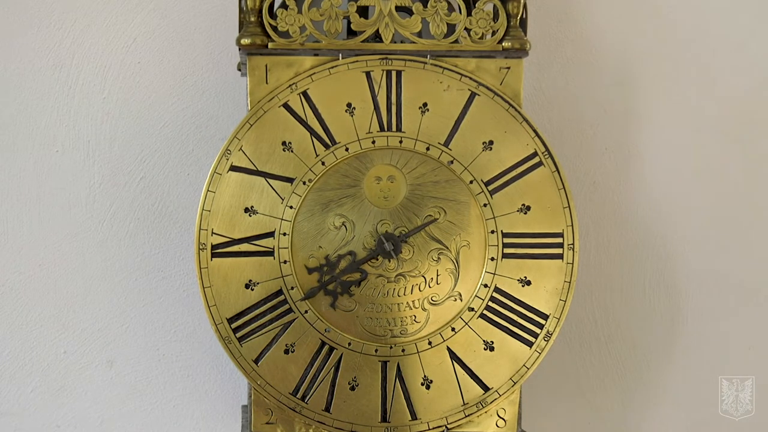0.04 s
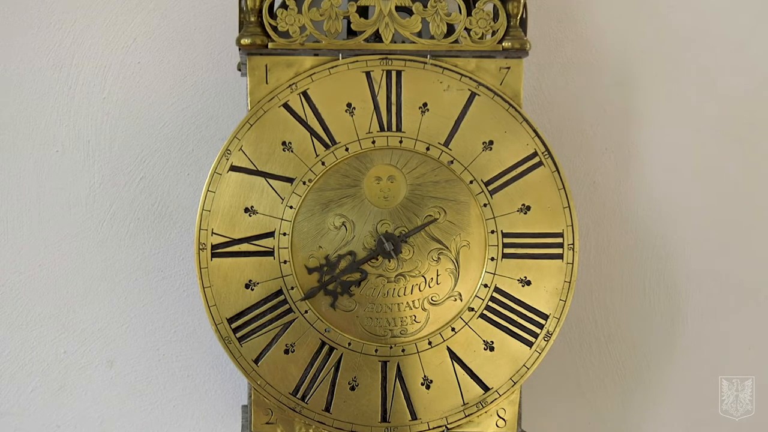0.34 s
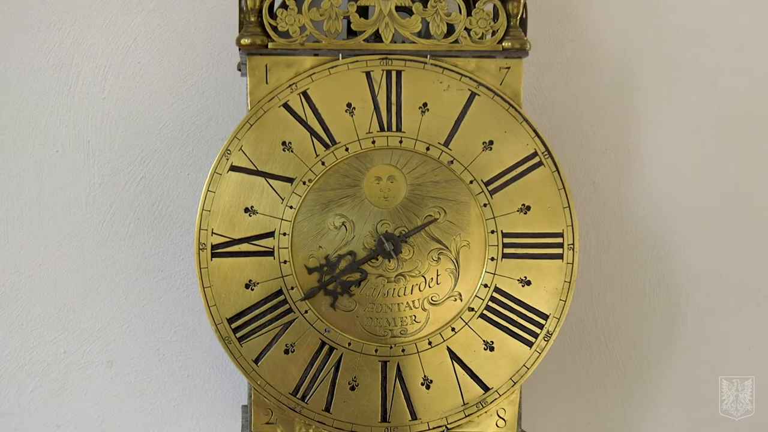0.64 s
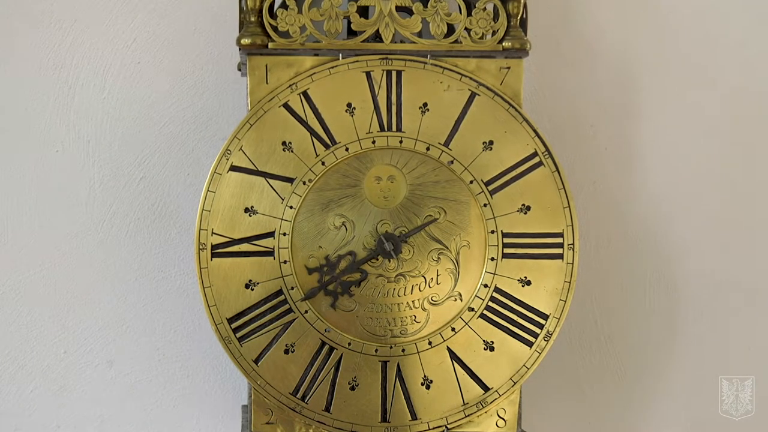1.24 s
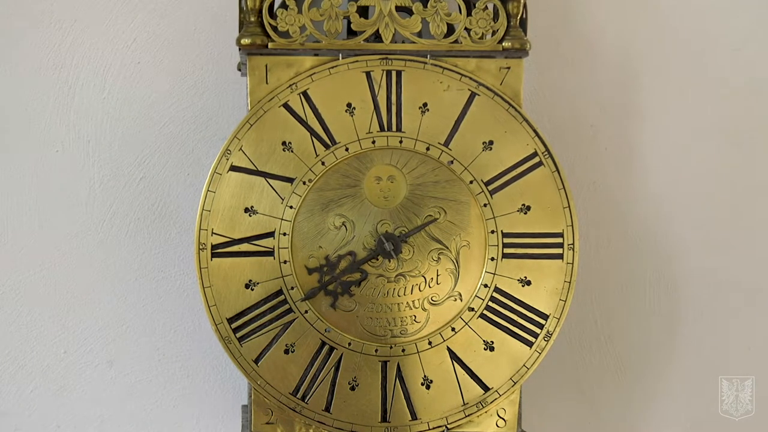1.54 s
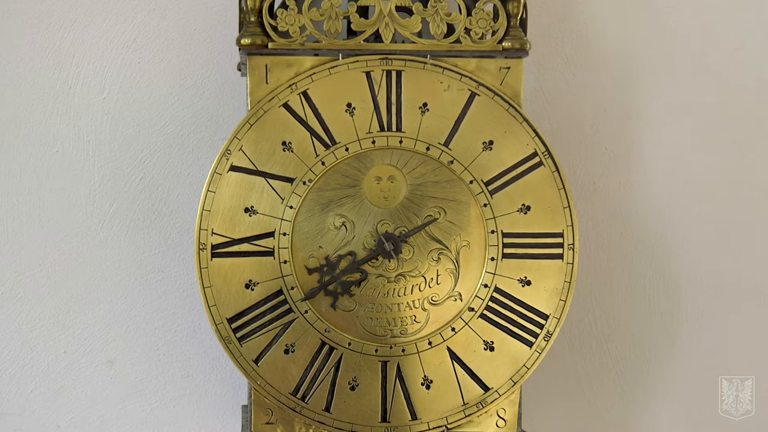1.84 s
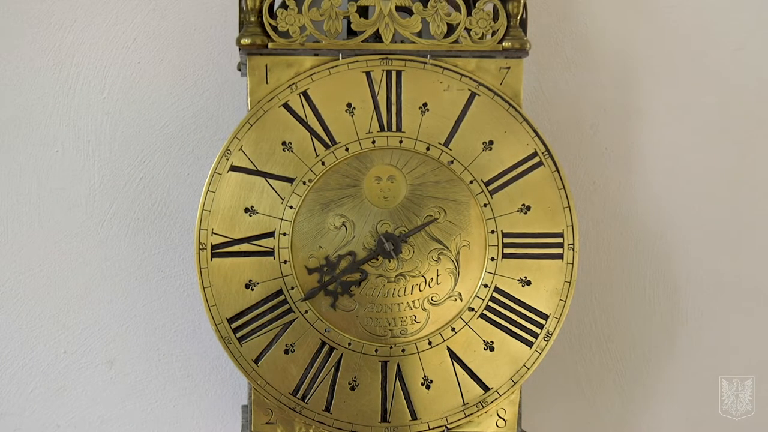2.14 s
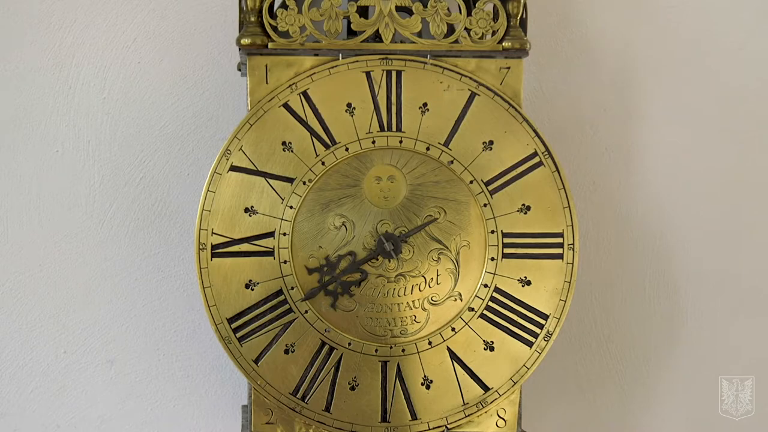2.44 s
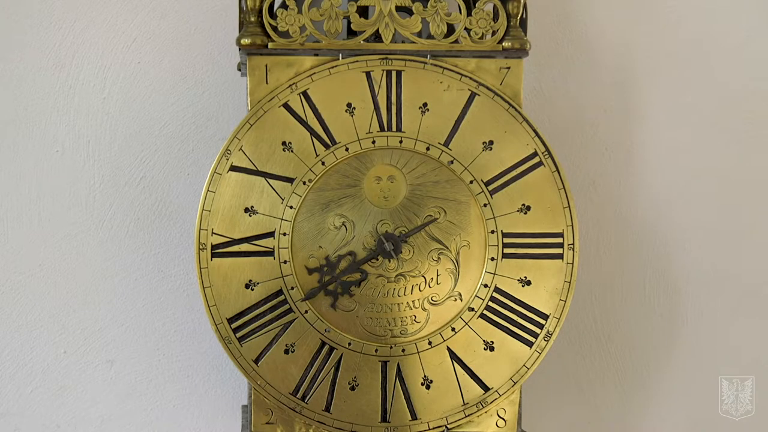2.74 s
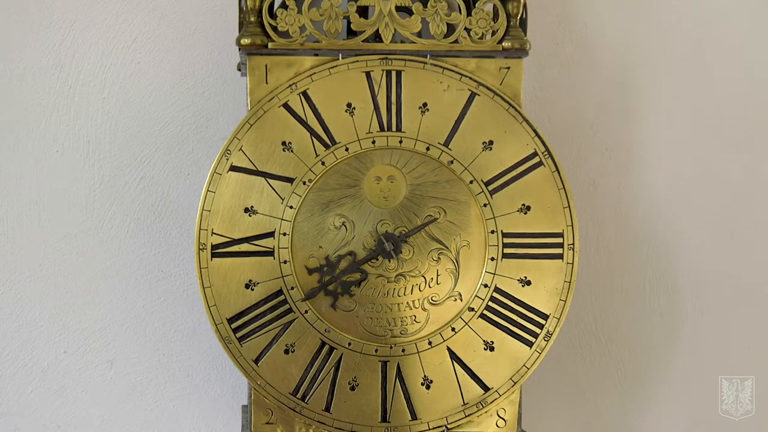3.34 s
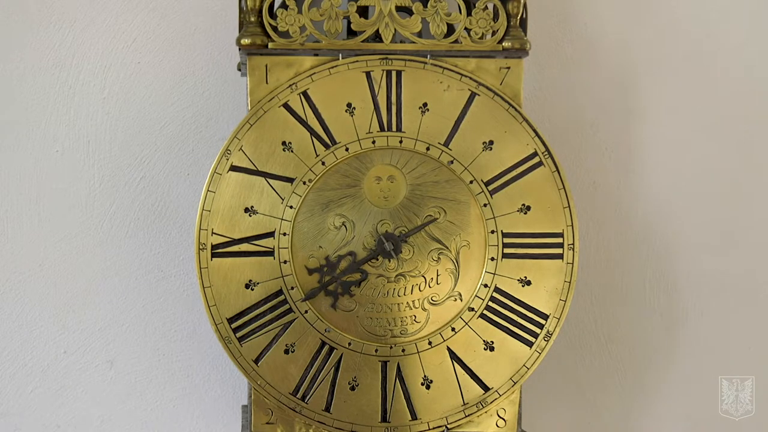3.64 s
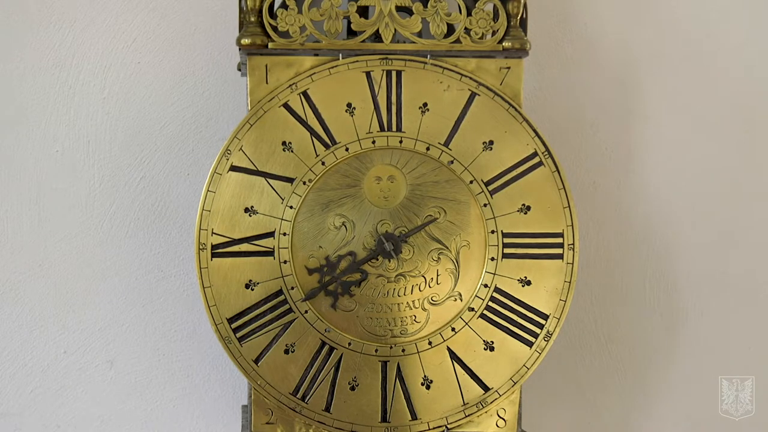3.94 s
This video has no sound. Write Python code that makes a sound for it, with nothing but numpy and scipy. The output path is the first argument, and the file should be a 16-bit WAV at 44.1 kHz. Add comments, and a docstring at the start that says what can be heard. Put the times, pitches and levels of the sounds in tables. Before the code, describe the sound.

A brass clock strikes its bell, heard close in a small room. At first the bell still rings from an earlier blow, over faintly whirring, rattling gears with small clicks and dull knocks. At about 1.3 and 3.5 seconds the hammer hits, each time just after a lever clicks. Each bright clang dies quickly into a lingering, wavering ring, while the mechanism noise dips and swells back.

```python
"""A brass lantern clock strikes the hour in a small room, heard close on a stereo pair of microphones.
Its bell still rings from the blow before. The gear train whirrs and rattles, pins and levers click
and knock the case, and twice the hammer hits: a bright clang dies fast over slowly beating low partials.
The room rumbles faintly underneath. The recorder's gain control ducks at each blow and swells back."""
import sys
import numpy as np
from scipy import signal
from scipy.fft import rfft, irfft
from scipy.io import wavfile
from scipy.ndimage import uniform_filter1d, minimum_filter1d

SR = 44100
rng = np.random.default_rng(int(sys.argv[2]) if len(sys.argv) > 2 else 0)


def transcribe(signal):
    """Save signal, clipped to [-1, 1], as a 16-bit WAV file at the path in sys.argv[1]."""
    frames = np.atleast_2d(signal).T
    limited = np.clip(frames, -1, 1)
    pcm = np.round(limited * 32767).astype(np.int16)
    wavfile.write(sys.argv[1], SR, pcm)


N = 176400

# hammer blows: t/s, strength/dB, extra level/dB of the hum note, of the second and of the third partial
HAMMER_BLOWS = [(-1.078, 0, 2.8, -2.3, .3), (1.2603, 0, -2, .3, 0), (3.477, 0, -.7, -7, -1.3)]
# spectrum of rattling teeth, pins and levers: f/Hz, relative level/dB
METAL_SPECTRUM = [(200, -6), (1000, -5.5), (2500, 0), (5500, -2), (9000, -5.5), (12000, -14.5),
                  (16000, -21.5)]


def amp(db):
    return 10 ** (np.asarray(db) / 20)


def unit(x):
    return x / np.sqrt(np.mean(x ** 2) + 1e-20)


def pan(db):
    """Left and right gains for a level difference."""
    return amp(np.array([[db], [-db]]) / 2)


def since(s):
    """Seconds since the moment s, for every sample."""
    return np.arange(N) / SR - s


def fade(t, t60):
    """Exponential decay that starts at t = 0."""
    return (t >= 0) * np.exp(-np.log(1000) * np.maximum(t, 0) / t60)


def tone(turns, lead):
    """A sine that reaches the left microphone ahead of the right by lead radians."""
    return np.sin(2 * np.pi * turns + np.array([[lead], [-lead]]) / 2)


def noise(spectrum, correlation=.93):
    """Coloured noise of unit RMS, nearly the same at both microphones."""
    hz, db = np.transpose(spectrum)
    gains = amp(np.interp(np.log(np.fft.rfftfreq(N, 1 / SR) + 1), np.log(hz), db))
    mid, side = irfft(rfft(rng.standard_normal((2, N))) * gains, N)
    return unit(mid * np.sqrt(1 + correlation) + side * np.sqrt(1 - correlation) * np.array([[1], [-1]]))


def bell():
    """Each blow sets all partials ringing anew; close twins make them beat."""
    # long partials: f/Hz, relative level/dB, t60/s, left-right/dB, left's lead/rad,
    # twin's offset/Hz, twin's level/dB, first swell/s
    long_partials = [(412.2, -51.7, 28, 2, -.18, 7.0, -16, .06),
                     (1135.0, -39.6, 15, -3.9, -.57, 2.15, -10.5, .43),
                     (2099.3, -26.6, 5.8, -3.7, -.18, 6.55, -16, .085),
                     (3278.5, -28.8, 2.5, -2, .48, -10.93, -4.2, .071)]
    # short partials of the clang: f/Hz, relative level/dB, t60/s, left-right/dB
    clang_partials = [(2125, -31, .09, -1), (4668, -28, .6, 5.5), (5431, -25.5, .48, 0), (5616, -39, .3, 0),
                      (5857, -31, .72, -1), (6234, -29, .58, 2), (7230, -49, .65, 0), (7338, -45, .55, 0),
                      (7984, -29, .56, -.6), (8387, -37, .3, 0), (8699, -41.5, .35, 0),
                      (9787, -33, .33, -.6), (9904, -41, .48, 0), (11238, -42, .5, 0), (11657, -45, .52, 0),
                      (11975, -48, .38, 0), (12840, -50, .3, 0), (13490, -60, 1.2, 0), (13690, -57, .62, 0),
                      (14218, -51, .5, 0), (14725, -56, .3, 0), (15180, -60, .42, 0)]
    twin_pan = pan(db=8)
    out = np.zeros((2, N))
    ends = [blow[0] for blow in HAMMER_BLOWS[1:]] + [N / SR]
    for (start, blow_db, *extras), end in zip(HAMMER_BLOWS, ends):
        span = (since(start) >= 0) & (since(end) < 0)
        t = since(start)[span]
        ring = np.zeros((2, len(t)))
        for partial, extra_db in zip(long_partials, extras + [0]):
            hz, db, t60, side_db, lead, beat_hz, twin_db, swell_s = partial
            twin = amp(twin_db) * twin_pan * tone(hz * t + beat_hz * (t - swell_s), lead)
            ring += amp(db) * pan(side_db) * fade(t, t60) * (amp(extra_db) * tone(hz * t, lead) + twin)
        for hz, db, t60, side_db in clang_partials:
            phase, twin_phase = rng.random(2)
            beat_hz = rng.uniform(6, 18)
            lead = rng.choice([-.33, .33])
            twin = amp(-10.5) * twin_pan * tone((hz - beat_hz) * t + twin_phase, -2 * lead)
            ring += amp(db + 1.3) * pan(side_db) * fade(t, t60) * (tone(hz * t + phase, lead) + twin)
        out[:, span] = np.sqrt(2) * amp(blow_db - 1) * ring
    return out


def gear_whirr():
    """Wheels and fly whirr unevenly: the level flickers, as a whole and in patches of the spectrum."""
    # spectrum of the running train: f/Hz, relative level/dB
    whirr_spectrum = [(25, -33), (70, -10.5), (100, -11.5), (140, -2.5), (180, -6.5), (225, 3.5), (255, -1),
                      (285, 5), (365, 3), (460, -9), (520, -2.5), (600, -11.5), (850, -7.5), (1350, -7),
                      (1800, -12.5), (3000, -12.5), (6000, -17.5), (10000, -24), (15000, -37)]
    patch_db, flicker_db = 2.26, 1.36
    frames = signal.stft(noise(whirr_spectrum), nperseg=512, noverlap=384)[2]
    patches = uniform_filter1d(rng.standard_normal(frames.shape[1:]), size=5, axis=0)
    patches = unit(uniform_filter1d(patches, size=18, axis=1))
    flicker = unit(uniform_filter1d(rng.standard_normal(frames.shape[2]), size=9))
    frames *= amp(patch_db * patches + flicker_db * flicker)
    whirr = signal.istft(frames, nperseg=512, noverlap=384)[1][:, :N]
    return amp(-64) * unit(whirr)


def gear_rattle(hits_per_s=170, spread_db=3):
    """Gear teeth hit at random, each a tiny burst of noise."""
    hits = rng.random(N) < hits_per_s / SR
    teeth = hits * amp(spread_db * np.minimum(rng.exponential(1, N), 4))
    power = signal.fftconvolve(teeth ** 2, fade(since(0), t60=.032) ** 2)[:N]
    return amp(-72.5) * unit(np.sqrt(abs(power)) * noise(METAL_SPECTRUM))


def room_rumble():
    """Steady low room tone."""
    # spectrum of the room tone: f/Hz, relative level/dB
    rumble_spectrum = [(20, -33), (35, -21.5), (48, -12), (70, 2.5), (95, -8.5), (140, -9.5), (250, -15.5),
                       (1000, -51), (16000, -79.5)]
    return amp(-78) * noise(rumble_spectrum)


def levers():
    """Pins slip with a hard tick and a short rustle; the hammer lever trips just before each blow."""
    # clicks of levers and pins: t/s, level/dB
    clicks = [(.435, -68), (.6155, -66), (0.765, -66), (1.0016, -70), (1.05, -64), (1.1717, -68),
              (1.2089, -51.5), (1.241, -55.5), (1.876, -59), (2.4433, -63), (2.5654, -61.5), (2.816, -68),
              (3.2994, -69.5), (3.4318, -52.5), (3.462, -59.5)]
    ticks = sum(amp(db - 6) * fade(since(s), t60=.0069) for s, db in clicks)
    rustles = sum(amp(db) * fade(since(s), t60=.15) for s, db in clicks)
    return (ticks + rustles) * noise(METAL_SPECTRUM)


def case_knocks():
    """Slipping pins and levers ring the low modes of the case."""
    # dull knocks of the train against the case: t/s, level/dB
    knocks = [(.435, -61.5), (1.2092, -62), (2.816, -71), (3.4325, -65)]
    # modes of the case: f/Hz, relative level/dB, t60/s
    modes = [(228, -1.5, 0.69), (274.7, -3, .45), (378, -3, 0.95), (527, -4, .45)]
    return sum(amp(db + mode_db) * fade(since(s), t60) * np.sin(2 * np.pi * hz * since(s))
               for s, db in knocks for hz, mode_db, t60 in modes)


def hammer():
    """The crack of iron on bronze and its short wash in the room."""
    # spectrum of the hammer's contact: f/Hz, relative level/dB
    crack_spectrum = [(25, -32), (100, -14), (300, -15), (800, -25.5), (1800, -15), (2200, 9.5), (2700, -6),
                      (3200, 0), (3700, -5), (5600, 3), (9000, -10), (12000, -12), (16000, -20)]
    # spectrum of the room's answer: f/Hz, relative level/dB
    wash_spectrum = [(25, -33.5), (100, -11), (400, -10.5), (1200, -5.5), (2200, -7), (2700, -11.5),
                     (3900, -10), (4700, -2.5), (5600, -2.5), (8000, -3.5), (12000, -10.5), (16000, -25.5)]
    crack = sum(amp(db - 23) * fade(since(s), t60=.062) for s, db, *_ in HAMMER_BLOWS)
    wash = sum(amp(db - 41) * fade(since(s), t60=.6) for s, db, *_ in HAMMER_BLOWS)
    return crack * noise(crack_spectrum) + wash * noise(wash_spectrum)


def scene():
    """The clock and the room as they reach the microphones."""
    return bell() + hammer() + gear_whirr() + gear_rattle() + levers() + case_knocks() + room_rumble()


def record(dry):
    """The recorder's gain control ducks in three stages and recovers slowly; a low-pass follows."""
    threshold_db, slope, release_db_per_s = -37, .74, 28
    quick_s, slow_s, cutoff_hz = .012, .11, 15750
    t = since(0)
    peak = -minimum_filter1d(-abs(dry).mean(0), size=45)
    peak_db = 10 * np.log10(abs(uniform_filter1d(peak ** 2, size=45)) + 1e-12)
    fall_db = t * release_db_per_s
    held_db = np.maximum.accumulate(peak_db + fall_db) - fall_db
    target_db = slope * np.maximum(held_db - threshold_db, 0)
    change = target_db - target_db[0]  # the ringing bell already holds the gain down at t = 0
    pole = np.exp(-1 / (quick_s * SR))
    quick = signal.lfilter([1 - pole], [1, -pole], change)
    integral = np.cumsum(change) / SR
    slow = (integral - np.interp(t - slow_s, t, integral)) / slow_s  # running mean
    duck_db = target_db[0] + .39 * change + .14 * quick + .47 * slow
    lowpass = signal.firwin(255, cutoff_hz, window=("kaiser", 9), fs=SR)
    return signal.oaconvolve(dry * amp(-duck_db), lowpass[None], "same")


dry = scene()
out = record(dry)
transcribe(out)
```